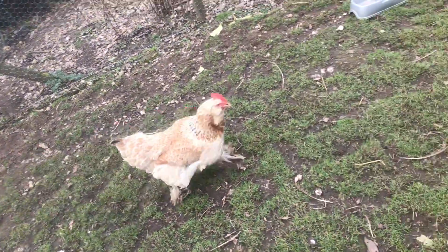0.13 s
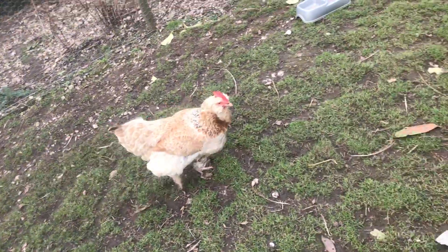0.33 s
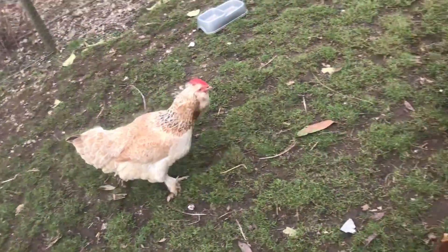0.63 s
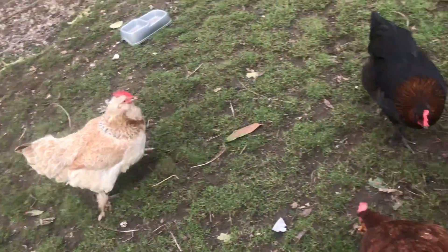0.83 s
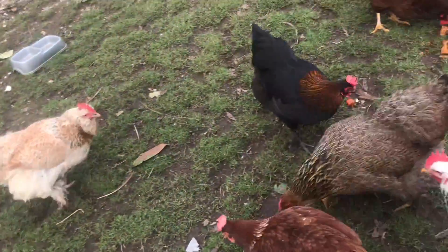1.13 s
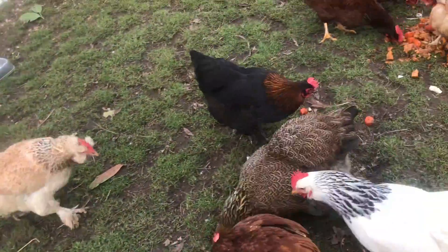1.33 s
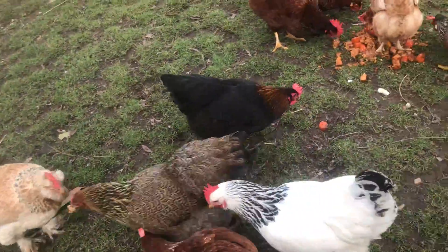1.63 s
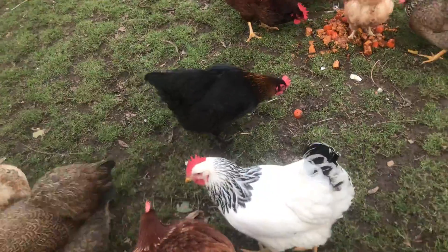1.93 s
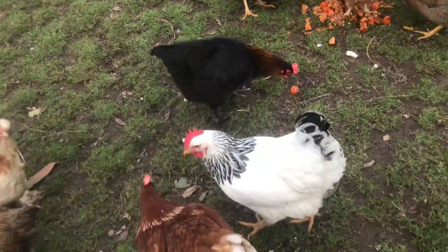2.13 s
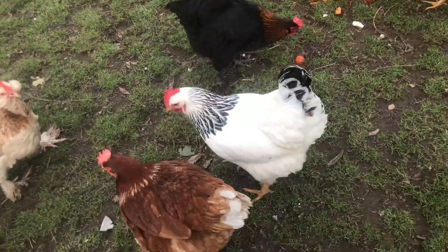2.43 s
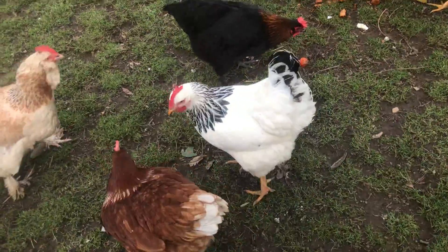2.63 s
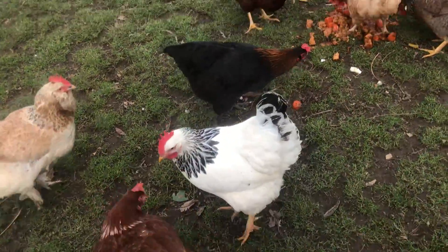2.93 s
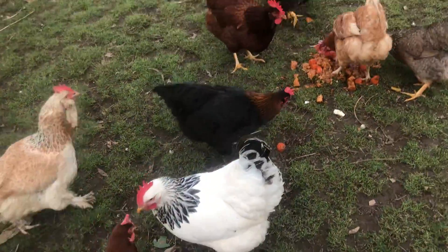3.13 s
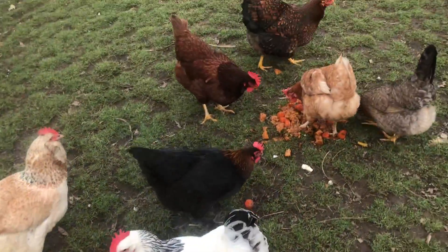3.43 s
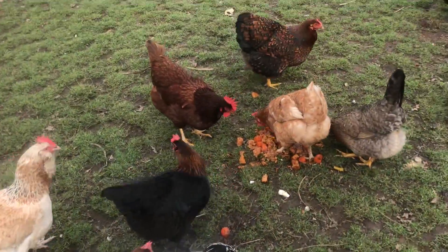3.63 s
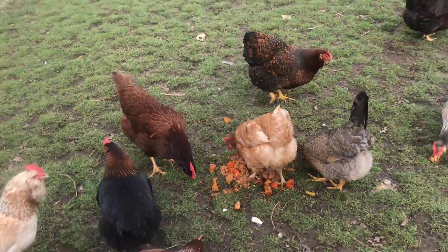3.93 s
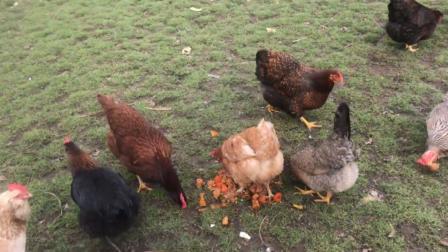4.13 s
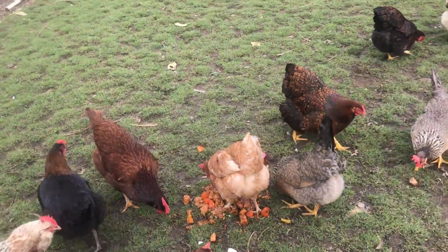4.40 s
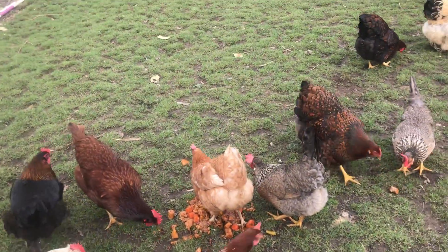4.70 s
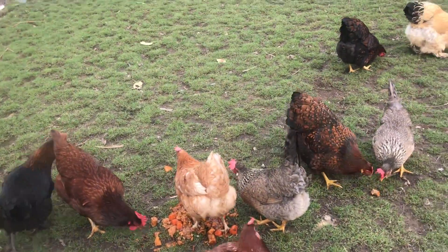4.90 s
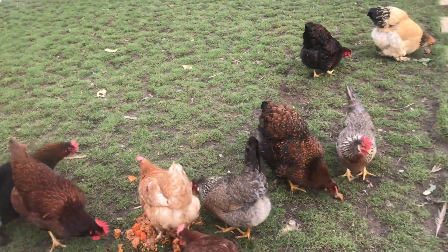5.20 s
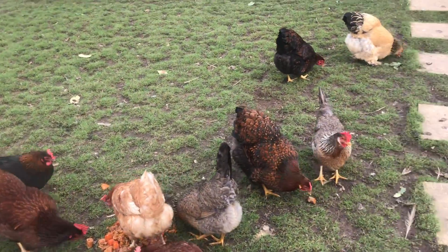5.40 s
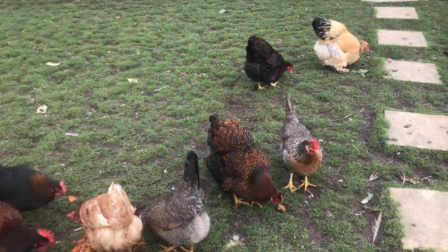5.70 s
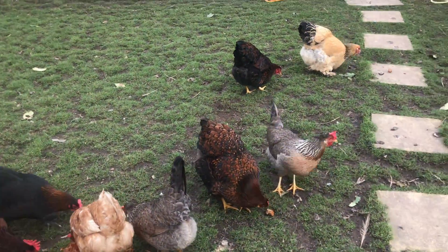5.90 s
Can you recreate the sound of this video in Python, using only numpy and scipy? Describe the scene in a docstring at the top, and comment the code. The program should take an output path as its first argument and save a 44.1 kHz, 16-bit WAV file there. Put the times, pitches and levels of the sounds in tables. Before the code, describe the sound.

Hens feed on a garden lawn close to a handheld mono microphone. A cluster of short, low clucks comes first, then a drawn-out hoarse croon that rises and clears. A songbird whistles from the trees, more soft clucks follow, a further hen rasps, and a sharp, loud yip comes near the end. Dry pecks, faint steady ticking, light wind and dull bass bumps run underneath.

```python
"""A garden lawn: hens feed, mostly near, with short soft clucks, a long hoarse croon and one sharp yip.
Their voices are pulse trains through throat shapes; a second hen, further off, croons as shaped noise.
Pecks, grass scuffs and a faint electrical ticking are noise bursts. A songbird and far birds whistle as
gliding sines, with tree echo. Light wind is shaped noise; it and the moving hand thump on the microphone,
as sines that slide down in the bass."""
import sys
import numpy as np
from scipy import signal
from scipy.fft import rfft, irfft, next_fast_len
from scipy.io import wavfile
from scipy.ndimage import map_coordinates

SR = 44100
rng = np.random.default_rng(int(sys.argv[2]) if len(sys.argv) > 2 else 0)


def to_wav(s):
    """Save 16-bit WAV."""
    ch = np.atleast_2d(s).T  # columns
    pcm = np.round(np.clip(ch, -1, 1) * 32767)  # PCM
    wavfile.write(sys.argv[1], SR, pcm.astype(np.int16))


N = 266981  # length in samples


def amp(db):
    """Decibels to gain."""
    return 10 ** (np.asarray(db) / 20)


def unit(x):
    """Scale to rms 1."""
    return x / np.sqrt(np.mean(x ** 2) + 1e-20)


def along(points, hz):
    """Read (freq_hz, value) points on a log frequency axis."""
    point_hz, values = np.transpose(points)
    return np.interp(np.log(hz + 1), np.log(point_hz + 1), values)


def curve(rows):
    """Read (time_s, value) points at every sample."""
    return np.interp(np.arange(N) / SR, *np.transpose(rows))


def wobble(rate, size=N):
    """A smooth random curve with this many knots a second."""
    knots = rng.standard_normal(int(size * rate / SR) + 4)
    return map_coordinates(knots, [np.arange(size) * rate / SR])


def envelope(t, length, attack, release):
    """A rounded rise, a hold and a rounded fall; silent outside."""
    ramp = np.minimum(t / attack, (length - t) / release)
    return np.sin(np.pi / 2 * np.clip(ramp, 0, 1))


def filtered(x, response):
    """Multiply the spectrum of x by a response of frequency."""
    padded = next_fast_len(len(x) + 8192)
    hz = np.fft.rfftfreq(padded, 1 / SR)
    return irfft(rfft(x, padded) * response(hz), padded)[:len(x)]


def coloured(x, spectrum):
    """Filter x by (freq_hz, level_db) points and scale to rms 1."""
    return unit(filtered(x, lambda hz: amp(along(spectrum, hz))))


def noise(spectrum, size=N):
    """Coloured noise of rms 1."""
    return coloured(rng.standard_normal(size), spectrum)


def causal(gain_db):
    """Minimum-phase impulse response with these gains on an even frequency grid, by folding the cepstrum."""
    cepstrum = irfft(np.log(amp(gain_db)))
    half = len(cepstrum) // 2
    folded = np.r_[cepstrum[0], 2 * cepstrum[1:half], np.zeros(half)]
    return irfft(np.exp(rfft(folded)))


def phase_of(hz):
    """Running phase of a moving frequency."""
    return 2 * np.pi * np.cumsum(hz) / SR


def add(track, start_s, sound):
    """Mix a sound into the track at a start time."""
    part = track[max(round(start_s * SR), 0):][:len(sound)]
    part += sound[:len(part)]


# hens' clucks, mostly near, with two faint distant ones: start_s, length_s, first_hz, last_hz, level_db,
# crest (0-1 of the call), cycles (per repeat), undertones_db (at the crest), tilt_db (per octave),
# beak (0 shut - 1 wide open)
CLUCK_CALLS = [(0.468, 0.04, 888, 900, -36, 0.47, 2, -8.5, -17, 0),
               (0.502, 0.052, 791, 665, -47, 0.58, 1, 0, 0, 0),
               (0.675, 0.052, 774, 720, -51.5, 0.53, 1, 0, -0.5, 0.08),
               (0.706, .04, 717, 705, -42.5, 0.55, 4, -14, -2, 0.06),
               (0.795, .039, 842, 657, -43, 0.36, 3, -1.5, -4.5, 0.12),
               (0.89, 0.023, 950, 910, -48, 0.74, 2, -14, -16, 0),
               (0.969, 0.037, 820, 750, -46, 0.55, 1, 0, -6, 0.16),
               (0.984, 0.048, 952, 670, -44, 0.2, 3, -7, -15, .26),
               (0.998, .029, 927, 950, -39.5, 0.46, 1, 0, -16.5, 0.11),
               (3.207, 0.034, 1640, 1430, -61, .4, 1, 0, -15, 0.2),
               (3.522, 0.041, 1165, 1100, -61.5, 0.4, 1, 0, -2, 0.33),
               (4.409, 0.051, 715, 755, -45, .42, 2, -3.5, -13, 0.01),
               (4.641, 0.051, 868, 805, -40, 0.5, 2, -3.5, -14, 0.02),
               (4.676, 0.017, 902, 840, -46.5, .5, 3, -5, -5, 0),
               (4.832, 0.062, 840, 770, -46, 0.23, 2, -5.5, -6.5, 0.15),
               (5.005, 0.034, 684, 760, -50, 0.66, 4, -4, -.5, 0.44),
               (5.12, 0.043, 842, 735, -49.5, 0.38, 1, 0, -1.5, .1),
               (5.7152, .029, 853, 832, -33, 0.57, 2, -23, 1.5, 1)]
# a hen's throat with the beak shut, ajar and wide open: freq_hz, gain_db
SHUT_THROAT = [(170, -8), (260, -8), (335, -31), (425, -19.5), (520, -5.5), (800, 0), (1050, 1.5),
               (1350, -5), (1600, -29.5), (1830, -3), (2020, -30.5), (3400, -42.5), (4500, -62)]
AJAR_THROAT = [(180, 4.5), (380, -5.5), (750, -9), (1150, -18), (1450, -6.5), (1700, 1.5), (2200, -37),
               (3200, -9), (4500, -54)]
GAPING_THROAT = [(180, 6), (450, -18), (900, -0.5), (1800, -5.5), (2700, -6), (3600, -16.5), (4500, -30),
                 (9000, -35)]
SAG, ARCH = 0.055, 0.13  # mid-call bend as a share of the tone: a shut beak sags it, a wide one arches it
UNDERTONE_GROWTH_DB = 6.5  # from the start to the end of a cluck
CLUCK_EDGE = 0.7  # share of a cluck given to swelling and fading


def clucks(jitter=0.013, shimmer_db=2.5, air_db=-24):
    """Each cluck is a bowed tone; when the syrinx repeats only every few cycles, undertones fill the gaps."""
    out = np.zeros(N)
    grid = np.linspace(0, SR / 2, 513)
    throats = np.array([along(shape, grid) for shape in (SHUT_THROAT, AJAR_THROAT, GAPING_THROAT)])
    for start, length, first, last, db, crest, cycles, under_db, tilt_db, beak in CLUCK_CALLS:
        u = np.linspace(0, 1, int(length * SR))
        bow = (ARCH * beak - SAG) * (1 - (2 * u - 1) ** 2)
        tone = (first + (last - first) * u) * (1 + bow + jitter * wobble(339, len(u)))
        # partials of the repeat rate; those between the tone's harmonics are undertones
        fold = max(round(cycles), 1)
        k = np.arange(1, 5 * fold + 1)[:, None]
        harmonic_db = tilt_db * np.log2(np.maximum(k / fold, 1))
        undertone_db = (under_db + UNDERTONE_GROWTH_DB * (u - crest)) * (k % fold > 0)
        partials = amp(harmonic_db + undertone_db) * np.cos(k * phase_of(tone / fold))
        source = unit(np.sum(partials, axis=0)) + amp(air_db) * rng.standard_normal(len(u))
        # the beak setting blends neighbouring throat shapes
        blend = np.maximum(1 - 2 * abs(np.clip(beak, 0, 1) - np.linspace(0, 1, len(throats))), 0)
        voice = signal.fftconvolve(source, causal(blend @ throats))[:len(u)]
        crest = np.clip(crest, 0.1, 0.9)
        swell = envelope(u, 0.98, CLUCK_EDGE * crest, CLUCK_EDGE * (1 - crest)) ** 1.4
        level = amp(db + shimmer_db * wobble(251, len(u)))
        add(out, start, unit(voice) * swell * level)
    return out


# the crooning hen's throat: freq_hz, gain_db
CROON_THROAT = [(200, -14), (340, -5), (540, -1), (740, -7.5), (1010, -2.5), (1200, -4.5), (1340, -15.5),
                (1600, -15), (1760, -15.5), (2050, -27), (2850, -31), (3550, -22.5), (4500, -38),
                (7000, -60)]
CROON_START_S, CROON_LENGTH_S, CROON_ATTACK_S, CROON_RELEASE_S = 1.88, 0.462, 0.061, 0.034
CROON_FROM_HZ, CROON_TO_HZ, CROON_EASE = 460, 598.6, 0.85  # ease is the exponent of the pitch rise
CROON_RASP_DB, RASP_EASES_DB = -50, 8  # rasp level at the start; its drop over the call
CROON_TONE_DB, TONE_GROWS_DB = -46, 15  # tone level at the end; its growth over the call
CLEARS_AT, CLEARS_OVER = 0.26, 0.083  # effort at which tone and overtones emerge; how gradually


def croon(jitter=0.02, scatter=0.23, second_db=-3, side_db=-4, side_hz=165, air_db=-13, waver=0.015):
    """A hoarse drawn-out call: effort lifts the pitch and clears a tone out of the syrinx's uneven snaps."""
    t = np.arange(N) / SR - CROON_START_S
    effort = np.clip(t / CROON_LENGTH_S, 0, 1)
    gate = envelope(t, CROON_LENGTH_S, CROON_ATTACK_S, CROON_RELEASE_S)
    rise_hz = (CROON_TO_HZ - CROON_FROM_HZ) * effort ** CROON_EASE
    pitch = (CROON_FROM_HZ + rise_hz) * (1 + waver * wobble(35))
    clear = (1 + np.tanh((effort - CLEARS_AT) / CLEARS_OVER)) / 2
    tone_db = CROON_TONE_DB - TONE_GROWS_DB * (1 - effort)
    hoarse_db = CROON_RASP_DB - RASP_EASES_DB * effort
    phase = phase_of(pitch * (1 + jitter * wobble(260)))
    tone = unit(np.cos(phase)) * amp(tone_db + wobble(120))
    # a slower, unsteady vibration puts a sideband above the octave
    slow = phase_of(side_hz * (1 + 0.0974 * wobble(150)))
    octave = amp(second_db) * unit(np.cos(2 * phase))
    sideband = amp(side_db) * unit(np.cos(2 * phase + slow))
    # one snap a cycle, each early or late by chance
    beats = np.flatnonzero(np.diff(phase // (2 * np.pi)))
    times = beats + scatter * SR / pitch[beats] * rng.standard_normal(len(beats))
    snaps = np.bincount(np.clip(times, 0, N - 1).astype(int), minlength=N)
    source = unit(snaps - snaps.mean()) + amp(air_db) * rng.standard_normal(N)
    throat = causal(along(CROON_THROAT, np.linspace(0, SR / 2, 513)))
    rasp = unit(signal.fftconvolve(source, throat)[:N])
    hoarse = amp(hoarse_db) * (clear * (octave + sideband) + rasp)
    return gate * amp(1.8 * wobble(29.9)) * (clear * tone + hoarse)


# spectrum of the further hen's rasp: freq_hz, level_db (relative, per Hz)
FAR_HEN_SPECTRUM = [(350, -57), (520, -2.5), (620, -0.5), (850, -0.5), (1150, -12), (1700, -17.5),
                    (2600, -43)]
FAR_START_S, FAR_LENGTH_S, FAR_ATTACK_S, FAR_RELEASE_S = 5.28, 0.62, 0.15, 0.1
FAR_DB, FAR_GROWS_DB_PER_S = -54.5, 15  # level reached at the end; growth towards it


def far_croon():
    """Another hen rasps softly further off: throat-shaped noise that grows until its release."""
    t = np.arange(N) / SR - FAR_START_S
    db = FAR_DB + FAR_GROWS_DB_PER_S * np.minimum(t - FAR_LENGTH_S, 0)
    gate = envelope(t, FAR_LENGTH_S, FAR_ATTACK_S, FAR_RELEASE_S)
    return gate * amp(db + 1.4 * wobble(70)) * noise(FAR_HEN_SPECTRUM)


def snap(spectrum, t60, lead):
    """A tiny noise burst: it rises for lead seconds, then decays by 60 dB in t60 seconds."""
    t = np.arange(SR // 10) / SR - lead
    return amp(np.minimum(30 * t / lead, -60 * t / t60)) * noise(spectrum, len(t))


# pecks and snaps: time_s, level_db (before the trim in pecks)
PECK_EVENTS = [(.568, -50), (1.115, -46.5), (1.6724, -50), (1.8193, -47.5), (1.9864, -44.5), (2.13, -45.5),
               (2.371, -47.5), (2.736, -49), (2.8435, -46), (2.9427, -46.5), (5.6098, -34.5),
               (5.8583, -50.5)]
# spectrum of a dry snap, shared with the grass: freq_hz, level_db (relative)
SNAP_SPECTRUM = [(800, -32), (2500, -15), (4000, -7), (5200, -2.5), (6200, 2.5), (7200, -6), (9000, -9),
                 (10500, -21), (13000, -25), (16000, -10)]
# spectrum of an electrical tick: freq_hz, level_db (relative)
TICK_SPECTRUM = [(4000, -17.5), (5300, -19), (6200, 1), (7200, -21), (10000, -20.5)]
PECK_T60_S = 0.011


def pecks(trim_db=-2, tick_db=-53, tick_t60=0.0049, lead=0.00092):
    """Dry snaps of beaks and twigs, and a faint even electrical ticking, all as noise bursts."""
    out = np.zeros(N)
    for start, db in PECK_EVENTS:
        add(out, start, amp(db + trim_db) * snap(SNAP_SPECTRUM, PECK_T60_S, lead))
    for start in np.arange(0.057, 6.02, 0.1024):
        add(out, start, amp(tick_db + rng.normal(0, 1.0)) * snap(TICK_SPECTRUM, tick_t60, lead))
    return out


# brushes through the grass: start_s, length_s, level_db
GRASS_SCUFFS = [(0.269, 0.052, -50.5), (3.913, 0.024, -50.5), (4.767, 0.022, -58.5), (5.687, 0.096, -60)]
SCUFF_RISE = 0.22  # share of a scuff spent swelling


def grass(rate=70, crackle_db=-75, life=0.00034):
    """Feet stir the grass: sparse tiny crackles at random (rate a second) and short swelling scuffs of noise."""
    grains = (rng.random(N) < rate / SR) * rng.random(N) ** 2
    # each grain spreads both ways in time, over about life seconds
    spread = signal.filtfilt([1], [1, -np.exp(-1 / (life * SR))], grains)
    crackles = coloured(spread * rng.standard_normal(N), SNAP_SPECTRUM)
    t = np.arange(N) / SR
    strokes = np.zeros(N)
    for start, length, db in GRASS_SCUFFS:
        swell = envelope(t - start, length, SCUFF_RISE * length, (1 - SCUFF_RISE) * length)
        strokes += amp(db) * swell ** 2
    return amp(crackle_db) * crackles + strokes * amp(2.5 * wobble(400)) * noise(SNAP_SPECTRUM)


# songbird in the trees: start_s, length_s, flick_hz (from above), lowest_hz, final_hz,
# level_db (reached at the end, before the mix and the release), trill_depth_hz
SONGBIRD_WHISTLES = [(2.75, .06, 0, 3600, 4350, -67, 30), (2.952, 0.18, 1300, 4150, 4590, -52, 50),
                     (3.382, .128, 350, 5530, 5930, -35.5, 135), (3.819, .195, 1600, 4200, 4630, -44, 30)]
FLICK_S = 0.007  # time constant of the drop onto the lowest pitch
RISE_FROM, RISE_TO = 0.12, 0.95  # part of the whistle over which it climbs
WHISTLE_ATTACK_S, WHISTLE_RELEASE_S, WHISTLE_GROWS_DB = 0.0045, 0.029, 8.5


def songbird(trill_hz=190, trill_at=0.7, trill_width=0.33):
    """Sine whistles that flick down, then climb and swell with a fast buzzing trill of the pitch."""
    out = np.zeros(N)
    for start, length, flick_hz, low_hz, top_hz, db, depth_hz in SONGBIRD_WHISTLES:
        t = np.arange(int(length * SR)) / SR
        u, size = t / length, len(t)
        climb = np.sin(np.pi / 2 * np.clip((u - RISE_FROM) / (RISE_TO - RISE_FROM), 0, 1)) ** 2
        flutter = 0.35 * depth_hz * wobble(89.6, size)
        pitch = low_hz + flick_hz * np.exp(-t / FLICK_S) + (top_hz - low_hz) * climb + flutter
        trill = np.sin(phase_of(trill_hz * (1 + 0.082 * wobble(37, size)))) + 0.48 * wobble(301, size)
        trill *= depth_hz * np.exp(-((u - trill_at) / trill_width) ** 2)
        growth_db = -WHISTLE_GROWS_DB * np.clip(1 - u, 0, 1) ** 2
        level = amp(db + growth_db + 2.7 * wobble(128.7, size))
        gate = envelope(t, length, WHISTLE_ATTACK_S, WHISTLE_RELEASE_S)
        add(out, start, gate * level * unit(np.sin(phase_of(pitch + trill))))
    return out


def far_note(length, hz, fall, blur):
    """One fuzzy sine that swells and fades while its pitch falls by a share."""
    u = np.linspace(0, 1, int(length * SR))
    pitch = hz * (1 - fall * u + blur * wobble(905, len(u)))
    return np.sin(np.pi * u) * np.sin(phase_of(pitch))


# thin far whistles: start_s, length_s, pitch_hz (at the start), level_db (before the mix)
FAR_WHISTLES = [(3.84, .32, 7430, -74), (4.16, .3, 7350, -70.5)]
TWITTER_START_S, TWITTER_GAP_S, TWITTER_NOTE_S = 4.47, 0.14, 0.12  # gap is from note start to note start
TWITTER_HZ, TWITTER_SINKS_HZ = 5430, 18  # pitch of the first note; drop from note to note


def twitter(level_db=-66.5, count=7):
    """Far birds: two thin sine whistles, then an even run of falling notes."""
    out = np.zeros(N)
    for start, length, hz, db in FAR_WHISTLES:
        add(out, start, amp(db) * far_note(length, hz, fall=0.02, blur=0.008))
    for k in range(count):
        note = far_note(TWITTER_NOTE_S, TWITTER_HZ - TWITTER_SINKS_HZ * k, fall=0.057, blur=0.027)
        add(out, TWITTER_START_S + k * TWITTER_GAP_S, amp(level_db) * note)
    return out


# bumps of the hand and wind on the microphone: start_s, level_db (peak of the swell), swell_s
MICROPHONE_BUMPS = [(0.326, -37.5, 0.017), (.448, -32.5, 0.0064), (.621, -39.5, 0.009), (.832, -40, 0.0092),
                    (.878, -36.5, 0.015), (0.958, -38, 0.016), (1.25, -39, 0.0032), (1.389, -39, 0.027),
                    (1.83, -31.5, 0.0064), (1.928, -34.5, .0042), (2.012, -34.5, 0.0027),
                    (2.05, -31, 0.012), (2.371, -38, 0.0012), (3.17, -37.5, 0.013), (3.766, -35, 0.0061),
                    (3.82, -33, 0.0071), (3.837, -39.5, .002), (3.85, -36, 0.0082), (3.999, -26.5, 0.011),
                    (5.833, -39, 0.0033), (5.854, -32, 0.0013), (5.895, -37, 0.0067), (5.933, -33, .0039)]


def thumps(rest_hz=62, sweep_hz=260, settle=0.0044, rise=0.85):
    """Each bump swells and dies as a sine that slides down to the ringing of the recorder's low-cut filter."""
    out = np.zeros(N)
    t = np.arange(SR // 6) / SR
    ring = np.sin(phase_of(rest_hz + sweep_hz * np.exp(-t / settle)))
    for start, db, swell in MICROPHONE_BUMPS:
        push = (t / swell) ** rise * np.exp(rise - t / swell)  # peaks near 1
        add(out, start, amp(db) * push * ring)
    return out


# strength of the wind on the microphone: time_s, level_db
WIND_LEVEL = [(0, -52.5), (.7, -52), (1.4, -49), (1.65, -52), (2.1, -42.5), (2.25, -49.5), (2.5, -43.5),
              (3, -51), (3.5, -50.5), (3.75, -45.5), (4.25, -55), (4.8, -52), (5.35, -51.5), (6.05, -54.5)]
# level of the fine hiss: time_s, level_db
HISS_CURVE = [(0, -70.5), (1.2, -67), (1.8, -72), (2.1, -67.5), (2.6, -71), (6.05, -73.5)]
# spectra of the buffeting, the garden wash and the hiss: freq_hz, level_db (relative, per Hz)
BUFFET_SPECTRUM = [(20, -48), (33, -18), (48, -3.5), (61, 0), (80, -6), (120, -12), (200, -19.5),
                   (400, -37), (650, -63.5)]
WASH_SPECTRUM = [(150, -14), (260, -5.5), (438, -7), (655, -1), (842, 1), (1710, -7.5), (2420, -15.5),
                 (3500, -23), (4550, -36), (7700, -120)]
HISS_SPECTRUM = [(2000, -19), (3200, -4.5), (4800, -4), (5600, 1), (6200, 3), (7200, -5), (9000, -7),
                 (10500, -19.5), (12500, -8.5), (15500, -16.5)]
WASH_DB = -66.5


def wind():
    """Light air buffets the microphone as bass noise, over a soft garden wash and a fine hiss."""
    buffet = coloured(rng.standard_normal(N) * amp(3.6 * wobble(35)), BUFFET_SPECTRUM)
    wash = amp(WASH_DB + 0.97 * wobble(10)) * noise(WASH_SPECTRUM)
    hiss = amp(curve(HISS_CURVE) + 1.97 * wobble(30)) * noise(HISS_SPECTRUM)
    return amp(curve(WIND_LEVEL)) * buffet + wash + hiss


# decay of the echo around the lawn: freq_hz, t60_s
TREE_DECAY = [(200, 0.33), (1500, 0.2), (5000, 0.41), (12000, 0.37)]


def echo(x):
    """Trees and fences scatter a diffuse tail: noise that decays at its own rate in each frequency band."""
    hz, t, bands = signal.stft(rng.standard_normal(SR), SR, nperseg=256)
    decay = amp(-60 * t / along(TREE_DECAY, hz)[:, None])
    tail = signal.istft(bands * decay, SR, nperseg=256)[1]
    return signal.fftconvolve(x, tail / np.linalg.norm(tail))[:N]


def scene():
    """The sounds of the lawn are almost dry; the birds in the trees carry more echo."""
    lawn = clucks() + croon() + pecks() + grass()
    bird, far_bird = songbird(), twitter()
    echo_send = amp(-19.5) * lawn + amp(-9.5) * bird + amp(-4.5) * far_bird
    direct = lawn + amp(-2.5) * bird + amp(0.5) * far_bird + far_croon()
    mix = direct + echo(echo_send) + thumps() + wind()
    return mix[None]  # one channel


TOP_HZ = 15850


def record(dry):
    """Nothing is kept above the band limit."""
    return np.array([filtered(channel, lambda hz: hz < TOP_HZ) for channel in dry])


dry = scene()
out = record(dry)
to_wav(out)
```